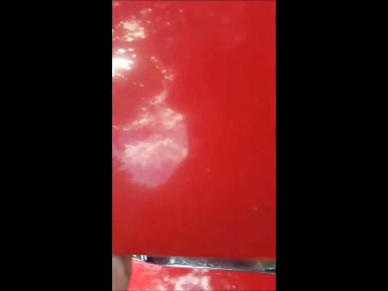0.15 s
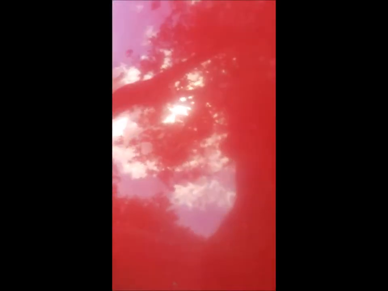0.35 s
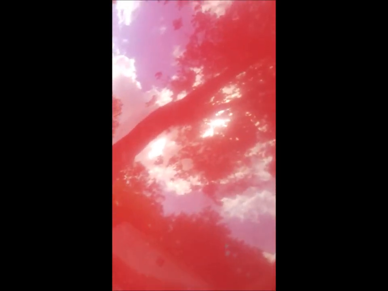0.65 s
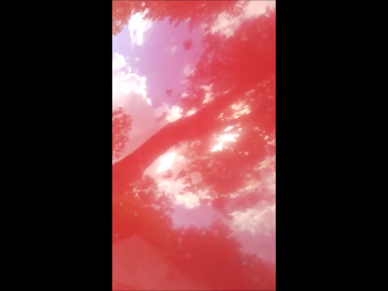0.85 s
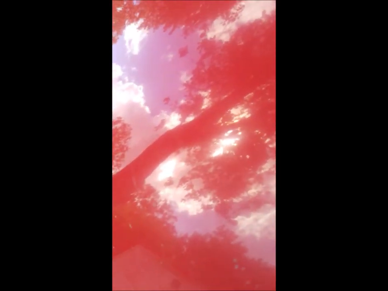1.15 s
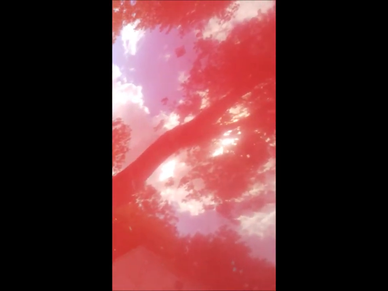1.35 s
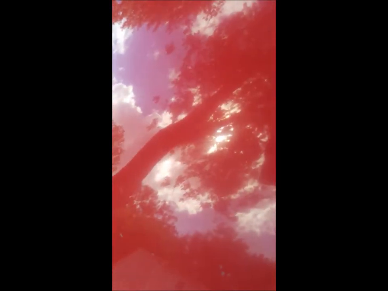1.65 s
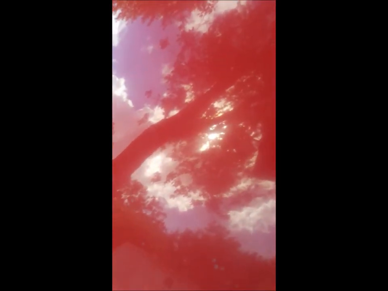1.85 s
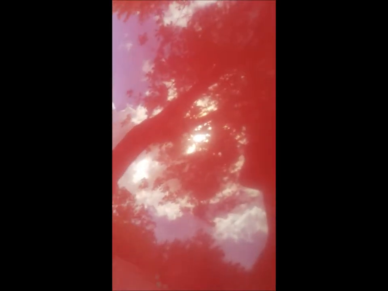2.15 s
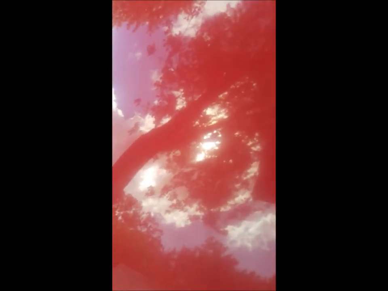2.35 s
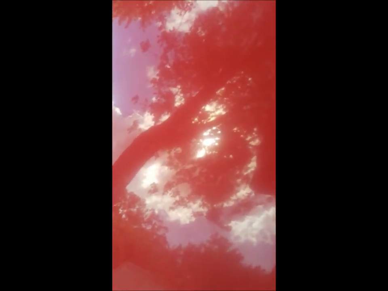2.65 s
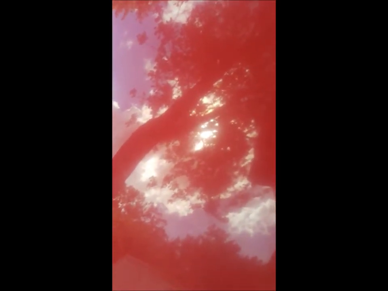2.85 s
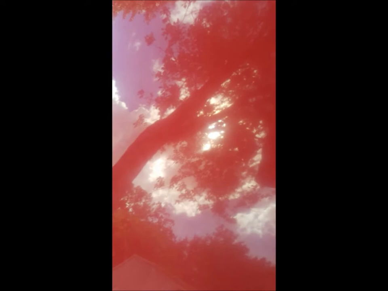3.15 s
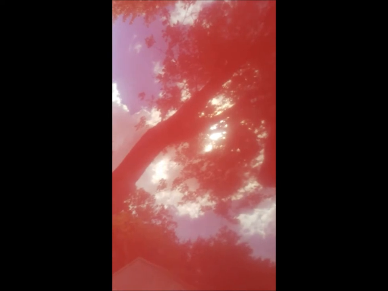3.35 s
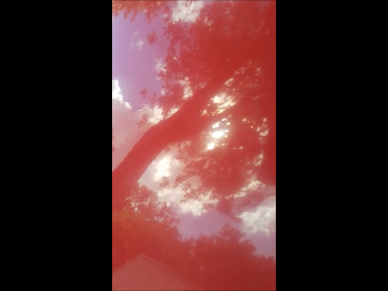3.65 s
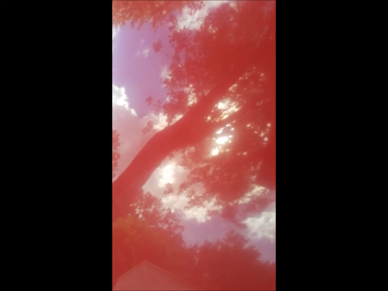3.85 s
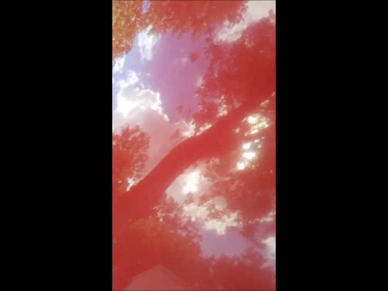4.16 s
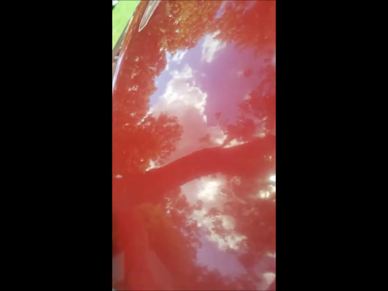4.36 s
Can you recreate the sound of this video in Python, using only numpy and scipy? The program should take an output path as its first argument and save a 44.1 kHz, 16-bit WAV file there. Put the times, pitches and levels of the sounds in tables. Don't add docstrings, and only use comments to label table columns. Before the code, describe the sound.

Two crisp clicks in the microphone grip come first, then about a second in, uneven hollow panel thuds with short metallic ring and latch rattle. The hardest, clankiest hits come between two and three seconds. A faint tyre hiss passes around two seconds. Light wind, leaves and far traffic stay low beneath close, left-leaning, dry outdoor handheld sound.

```python
import sys
import numpy as np
from scipy import signal
from scipy.io import wavfile

SR = 44100
rng = np.random.default_rng(int(sys.argv[2]) if len(sys.argv) > 2 else 0)


def boost_factor(decibels):
    exponent = np.asarray(decibels, float) / 20
    return 10 ** exponent


def wrap_up_sound(samples):
    columns = np.atleast_2d(samples).T
    tamed = np.clip(columns, -1, 1)
    steps = np.round(tamed * 32767).astype(np.int16)
    wavfile.write(sys.argv[1], SR, steps)


N = 198263

# start_s, thud_db, softness_db (clank below thud), edge_crack_db, frame_ring_db
HOOD_BLOWS = [(0.9, -40.5, 52, -67, -4), (0.946, -43, 38, -68, -2), (1.062, -14, 12, -29, 2.5),
              (1.317, -13, 30.5, -47.5, 2.5), (1.37, -24, 30, -58, -14), (1.777, -43, 39, -55, -8),
              (1.861, -16, 14, -52, 0.5), (1.884, -26, 35, -60, -12), (2.301, -15, 5, -23, 0),
              (2.378, -20, 11, -45, 1), (2.48, -34, 41, -64, -2), (2.571, -33.5, 30, -80, -6),
              (2.744, -17.5, 5, -18.5, 4), (3.029, -16, 12.5, -53.5, 4), (3.266, -45, 35, -79, 2),
              (3.32, -25, 30.5, -76, -2), (3.512, -31, 19, -63, 5), (3.546, -16.5, 16.5, -45, -5.5),
              (4.059, -43.5, 32, -53, -17), (4.213, -36.5, 44, -73, -1)]
LEFT_RIGHT = np.array([[1], [-1]])


def rms_one(x):
    return x / np.sqrt(np.mean(x ** 2) + 1e-20)


def in_time(rows):
    s, *columns = np.transpose(rows)
    return [np.interp(np.arange(N) / SR, s, column) for column in columns]


def at_hz(points, hz):
    points = np.array(points)
    return np.interp(np.log(hz), np.log(points[:, 0]), points[:, 1])


def pan(left_right_db):
    return boost_factor(left_right_db / 2 * LEFT_RIGHT)


def band(x, low_hz, high_hz):
    sos = signal.butter(2, [low_hz, min(high_hz, 0.45 * SR)], "band", fs=SR, output="sos")
    return signal.sosfilt(sos, x)


def peak(x, hz, width_hz):
    r = np.exp(-np.pi * width_hz / SR)
    top = np.array([1, 0, -1]) * (1 - r * r) / 2
    return signal.lfilter(top, [1, -2 * r * np.cos(2 * np.pi * hz / SR), r * r], x)


def drift(rate_hz):
    r = np.exp(-80 * np.pi * rate_hz / SR)
    white = rng.standard_normal(N // 40 + 2002)
    slow = rms_one(signal.lfilter([1], [1, -2 * r, r * r], white)[2000:])
    return np.interp(np.arange(N) / 40, np.arange(len(slow)), slow)


def add(out, sound, s):
    at = round(s * SR)
    out[..., at:at + sound.shape[-1]] += sound[..., :N - at]


def stroke(top_s, rise_s, fall_s):
    out = np.zeros(N)
    t = np.arange(round((rise_s + fall_s) * SR)) / SR
    ramp = np.interp(t, [0, rise_s, rise_s + fall_s], [0, 1, 0])
    add(out, np.sin(np.pi / 2 * ramp) ** 1.5, top_s - rise_s)
    return out


def contacts():
    # start_s, thud_db, softness_db, edge_crack_db, frame_ring_db
    latch_rattles = [
        (1.523, -45.5, 0, -65, -1),
        (1.668, -44.5, 0, -77, 7),
        (1.91, -32, 2, -32.5, 0),
        (3.842, -37.5, 5, -77, -3),
    ]
    rattle_body_db = -8.5
    rows = [(*row, 0) for row in HOOD_BLOWS] + [(*row, rattle_body_db) for row in latch_rattles]
    s, thud_db, soft_db, edge_db, ring_db, thin_db = np.transpose(sorted(rows))
    body_db = thud_db - 0.44 * soft_db + thin_db
    clank_db = thud_db - soft_db
    crack_db = clank_db + 0.25 * (edge_db - clank_db) + 1.5
    return zip(s, thud_db, body_db, body_db + ring_db, clank_db, crack_db, edge_db)


def knocks():
    # pitch_hz, level_db, t60_s (time to fall 60 dB)
    panel_modes = [(97.5, 3.5, 0.15), (206, 10, 0.15), (565, -0.5, 0.039), (126, -2, 0.17),
                   (182.7, 7.5, 0.11), (194.4, -2, 0.17), (222.5, -1.5, 0.3), (239.5, 3, 0.22),
                   (271, 1, 0.38), (294.5, -1.5, 0.25), (321.3, -2, 0.26), (368.6, -8.5, 0.37),
                   (418, -13.5, 0.4), (457.5, 4, 0.11), (493.3, -1, 0.21), (583, -30.5, 0.42),
                   (613, 0.5, 0.17), (643.7, -3, 0.19), (696, -7.5, 0.13), (741.4, 2, 0.11),
                   (847, -11, 0.12), (880, -14, 0.11), (960, -7, 0.11), (1090, -11.5, 0.16),
                   (1090, -56, 0.27), (1188, -16.5, 0.087)]
    # low_hz, high_hz, level_db, first_t60_s, tail_db, tail_t60_s
    upper_modes = [(820, 1300, -4, 0.095, -14, 0.1), (1020, 1490, -7.5, 0.028, -10, 0.2),
                   (1595, 2450, -0.5, 0.026, -7.5, 0.11), (2520, 4360, 3, 0.029, -8, 0.053),
                   (3520, 3540, -2, 0.0076, -18.5, 0.01), (4720, 5550, 0, 0.012, -22, 0.093),
                   (5950, 7800, 5.5, 0.016, -10.5, 0.041), (9000, 13000, -14.5, 0.012, -19, .03)]
    # pitch_hz, loss_db
    far_loss = [(100, 7), (250, -1.8), (450, 5.5), (700, 5.5), (1100, 3.5), (2000, -1.5), (4000, 25),
                (8000, 29), (12000, 13)]
    out, t = np.zeros((2, N)), np.arange(SR // 4) / SR
    hz, mode_db, t60 = np.transpose(panel_modes)[:, :, None]
    swell = 1 - np.exp(-(t / (0.0017 + 0.43 / hz)) ** 2)
    dying = boost_factor(-6.5 - 60 * t / t60) + boost_factor(-60 * t / (0.43 * t60))

    for s, thud_db, body_db, ring_db, clank_db, crack_db, edge_db in contacts():
        spread, scatter, far_db, far_phase, bend, beat = rng.standard_normal((6, *hz.shape))
        groups = [(290, thud_db - 11.0), (450, body_db - 0.5), (560, ring_db - 0.5),
                  (740, ring_db - 0.5), (1000, clank_db + 12)]
        twins = 1 + 0.8 * np.sin(2 * np.pi * 0.0281 * hz * beat * t)
        twins = twins + 0.55 * np.sin(2 * np.pi * 0.06 * hz * far_db * t)
        size = boost_factor(at_hz(groups, hz) + mode_db + 2.0 * spread) * swell * dying * twins
        phase = 2 * np.pi * hz * (1 + 0.0247 * bend) * (t - 0.0048) + np.pi + 0.97 * scatter
        late = phase - 2 * np.pi * hz * 0.00031 + 0.68 * far_phase
        far = size * boost_factor(1.3 * far_db - at_hz(far_loss, hz)) * np.cos(late)
        near = size * np.cos(phase)
        add(out, np.array([near.sum(axis=0), far.sum(axis=0)]), s + 0.001)

        levels = np.repeat([clank_db, crack_db, edge_db], [3, 3, 2])
        for level, (low, high, gain_db, first, tail_db, tail) in zip(levels, upper_modes):
            near, other = band(rng.standard_normal((2, len(t))), low, high)
            fade = boost_factor(-60 * t / first) + boost_factor(tail_db - 60 * t / tail)
            shape = np.minimum(t / 0.00079, 1) * fade * boost_factor(level + gain_db) / np.std(near)
            loss_db = at_hz(far_loss, np.sqrt(low * high))
            add(out[0], near * shape, s + 0.001588)
            add(out[1], (near + 0.5 * other) * shape * boost_factor(-loss_db), s + 0.001722)
    return out


def friction(shape, per_s, far_db):
    happens = rng.random((2, N)) < per_s / SR
    strength = boost_factor(1.4 * np.minimum(rng.exponential(1, (2, N)), 5))
    slips = happens * strength * rng.choice([-1, 1], (2, N))
    slips[1] = 0.59 * slips[0] + 0.59 * slips[1]
    rings = 0
    for hz, width, db in shape:
        rings = rings + boost_factor(db) * peak(peak(slips, hz, width), hz, 1.5 * width) / np.sqrt(width)
    return rms_one(rings) * boost_factor([[0], [-far_db]])


def slides():
    # pitch_hz, width_hz, level_db
    paint_tone, case_tone, squeak_tone = [(228, 17, 7), (448, 370, 20.5), (707, 1000, 12), (1020, 810, -13),
                                          (1630, 550, 6), (3140, 300, -4)], [(6980, 3600, 4.5), (9600, 860, -11),
                                                         (10540, 5900, -8.5), (5300, 1200, -15)], [(210, 40, 12), (673, 150, 16),
                                                                       (1270, 80, 4), (1800, 180, 8),
                                                                       (3600, 150, 1), (4290, 90, -1),
                                                                       (6430, 200, -9), (7800, 500, -4),
                                                                       (8710, 200, -7)]
    # loudest_s, fade_s, paint_db, case_db
    skids = [
        (.83, 0.067, -57.5, -67),
        (1.195, 0.073, -51.5, -63),
        (1.38, 0.048, -54, -69),
        (1.538, 0.057, -49, -65),
        (1.925, 0.065, -36.5, -65),
        (4.07, 0.12, -54, -72),
    ]
    # loudest_s, half_length_s, paint_db, case_db, squeak_db
    drags = [
        (0.924, 0.028, -49, -75, -80),
        (1.284, 0.057, -42, -51, -52.5),
        (1.79, 0.034, -57, -61, -54),
        (2.07, 0.27, -59, -61, -64),
        (3.523, 0.028, -46, -56, -45),
        (3.847, 0.05, -48.5, -57.5, -40.5),
        (3.901, 0.046, -43, -63, -46.5),
        (4.208, 0.03, -59, -64, -86),
        (4.398, 0.071, -53.5, -51, -54),
    ]
    levels = np.zeros((3, N))
    for s, fade, paint_db, case_db in skids:
        levels += boost_factor([[paint_db], [case_db], [paint_db - 14]]) * stroke(s, 0.024, fade)
    for s, half, *db in drags:
        levels += boost_factor(db)[:, None] * stroke(s, half, half)
    paint, case, squeak = levels * boost_factor(2.0 * drift(45))
    out = paint * friction(paint_tone, 3000, far_db=2.0)
    out = out + case * friction(case_tone, 16000, far_db=17)
    return out + squeak * friction(squeak_tone, 4600, far_db=10)


def ticks():
    # start_s, peak_db, low_knock_db
    grip_ticks = [(0.0285, -12.5, -15.5), (0.0373, -51, -32), (0.102, -43, -41.5), (0.1605, -16.5, -17),
                  (0.697, -45, -37.5), (0.7622, -59, -33.5), (0.8223, -68.5, -45), (0.8344, -34, -43),
                  (0.8514, -37.5, -40), (0.862, -42, -57), (1.181, -59, -49), (1.1965, -61, -44),
                  (1.212, -50, -58), (1.238, -66, -49), (1.346, -53, -42), (1.4816, -55, -45.5),
                  (1.5361, -64, -45), (1.6705, -34.5, -63), (1.943, -39, -40), (1.952, -45, -46),
                  (2.0605, -43, -37), (2.354, -45, -55), (3.0678, -43, -33.5), (4.0667, -58, -43),
                  (4.114, -56, -35.5), (4.1924, -45.5, -71), (4.358, -43.5, -36.5), (4.372, -47, -36.5),
                  (4.4066, -48, -39)]
    pan_db = 29
    out, t = np.zeros((2, N)), np.arange(SR // 40) / SR
    for s, top_db, case_db in grip_ticks:
        snap = rng.standard_normal(len(t)) * (boost_factor(-60 * t / 0.0007) + boost_factor(-16.5 - 60 * t / 0.01))
        snap[0] = 2.16
        bright = peak(snap, 7300, 2000) + 0.22 * peak(snap, 12600, 3100) + 0.48 * peak(snap, 3480, 1530)
        case = peak(snap, 934, 330) + 0.63 * peak(snap, 1830, 1300)
        bright = band(boost_factor(top_db + 12.0) * bright / abs(bright).max(), 1830, 11700)
        case = boost_factor(case_db + 10.5) * case / abs(case).max()
        add(out[0], bright + case, s + 0.0007)
        add(out[1], boost_factor(-pan_db) * bright + boost_factor(-0.45 * pan_db) * case, s + 0.0011784)
    return out


def passing():
    # pitch_hz, width_hz, level_db, left_right_db
    tyre_tone = [(1930, 590, -1.5, -12.5), (2810, 700, -1.5, -9), (3860, 420, -5, -6), (4900, 1200, -6, -1),
                 (6430, 840, -10.5, 15.5), (7500, 690, -11.5, 17), (8600, 1100, -9, 13),
                 (10600, 3000, -10.5, 5)]
    white = rng.standard_normal((2, N))
    hiss = 0
    for hz, width, db, pan_db in tyre_tone:
        ring = peak(peak(white, hz, width), hz, 1.3 * width) / np.sqrt(width)
        hiss = hiss + boost_factor(db) * pan(pan_db) * ring
    return boost_factor(-53.5) * stroke(2.06, 0.47, 0.5) * rms_one(hiss)


def wind():
    # time_s, strength_db, left_right_db
    wind_curve = [(0.0, -41, 5), (0.15, -49.5, 0.5), (0.57, -56.5, -2), (1.25, -51.5, -1), (1.3, -38, 3),
                  (1.5, -66.5, -8), (1.79, -55, 1), (1.94, -43.5, 21), (2.01, -49.5, 0), (2.53, -47, 12),
                  (2.59, -52, 5), (3.11, -52.5, 2), (3.35, -44.5, -3), (3.6, -50, 7), (3.76, -47, -20),
                  (3.81, -50, -3), (4.44, -42, -19.5), (4.49, -48, -9)]
    gust_db, pan_db = in_time(wind_curve)
    gusts = []
    for port in range(2):
        lumps = rms_one(band(band(rng.standard_normal(N), 33.4, 57.3), 30, 116))
        gusts.append(boost_factor(gust_db + 1.0 + 2.0 * drift(1.6)) * lumps)
    shared, own = rng.standard_normal(N), rng.standard_normal((2, N))
    rumble = boost_factor(2.8 * drift(3.9)) * rms_one(band(band(shared + 0.7 * own, 46.6, 140), 58.5, 300))
    rise_s, fade_s = 0.067, 0.19
    shudder = sum(boost_factor(thud_db - 32.5) * stroke(s + rise_s, rise_s, fade_s) for s, thud_db, *_ in HOOD_BLOWS)
    blown = np.array(gusts) + boost_factor(-50.5 + 0.61 * (gust_db - gust_db.mean())) * rumble
    return blown * pan(pan_db) + shudder * rumble * pan(-1.5)


def air():
    # pitch_hz, level_db (per Hz)
    air_tone = [(88, -27), (150, -4.5), (205, -15), (244, -4.5), (286, -14), (494, -19.5), (566, -21),
                (689, -19), (774, -13.5), (905, -25.5), (1210, -23), (2020, -18.5), (3840, -27),
                (14800, -43.5), (16000, -48)]
    # pitch_hz, likeness (-1 to 1)
    likeness = [(60, 0.38), (130, 1), (290, 0.76), (640, 0.6), (1410, -0.26), (3100, -0.038),
                (6820, -0.036), (15000, 0.075)]
    # pitch_hz, left_right_db
    balance = [(60, -1.0), (110, -3), (200, 1), (380, -3.5), (700, 1.5), (1290, -3.5), (2380, -8),
               (4400, 6), (8120, 11.5), (15000, -8)]
    out, white = 0, rng.standard_normal((2, 2, N))
    edges = 150 * 2 ** np.arange(0, 6.9, 1 / 3)
    for k, (low, high) in enumerate(zip(edges, edges[1:])):
        mid, side = band(white[k % 2], low, high)
        hz = np.sqrt(low * high)
        alike = np.clip(at_hz(likeness, hz), -1, 1)
        gain = boost_factor(at_hz(air_tone, hz) + 0.98 * drift(30)) * pan(at_hz(balance, hz))
        out = out + gain * (np.sqrt(1 + alike) * mid + np.sqrt(1 - alike) * side * LEFT_RIGHT)
    return boost_factor(-54.5) * rms_one(out)


def scene():
    return knocks() + slides() + ticks() + passing() + wind() + air()


def low_pass(x):
    return signal.sosfilt(signal.butter(12, 16960, fs=SR, output="sos"), x)


def record(dry):
    rounded = 0.95 * np.tanh(dry / 0.97)
    dull = signal.sosfilt(signal.cheby2(10, 50, 16400, fs=SR, output="sos"), rounded)
    return low_pass(dull)


dry = scene()
out = record(dry)
wrap_up_sound(out)
```